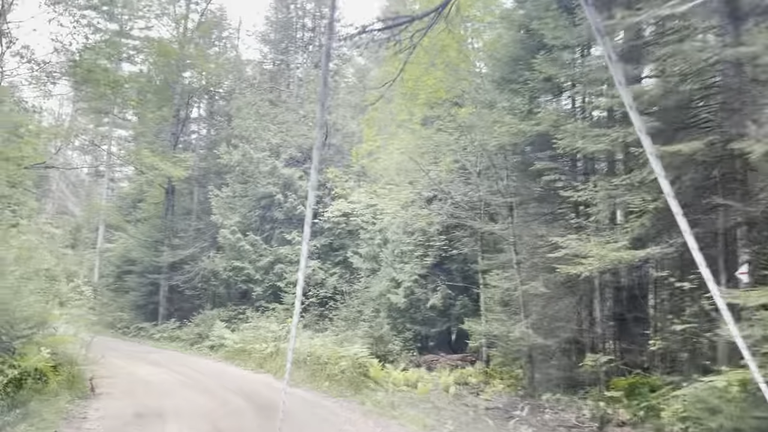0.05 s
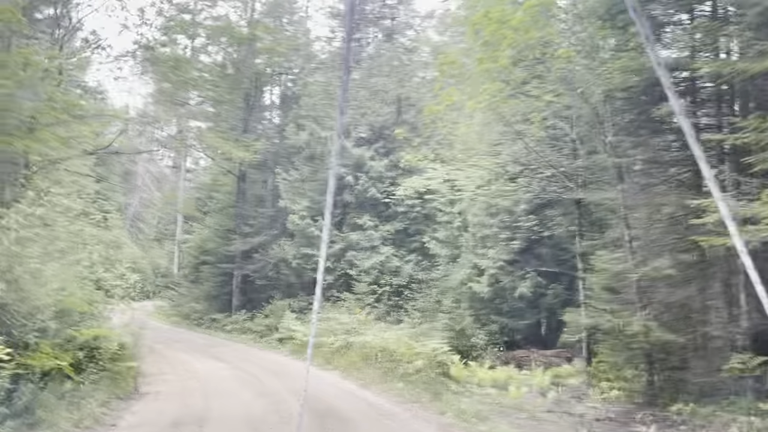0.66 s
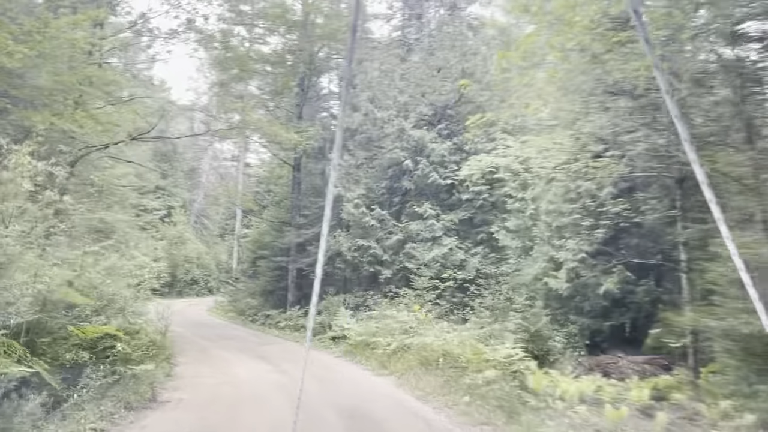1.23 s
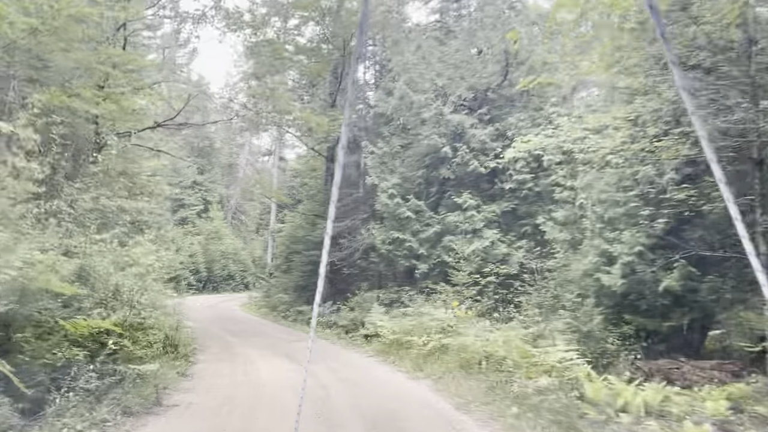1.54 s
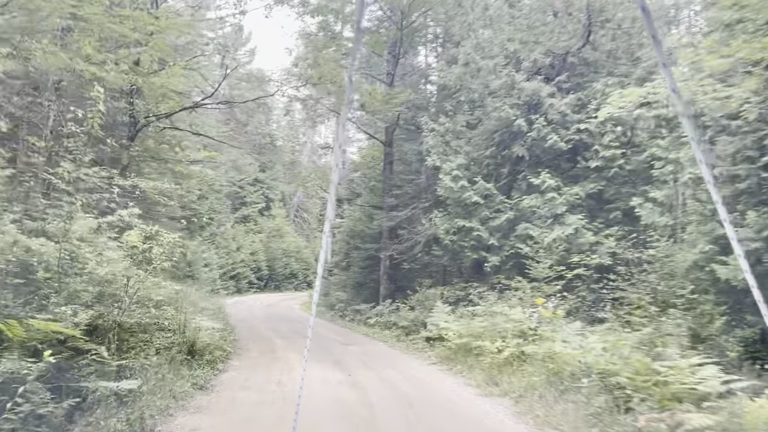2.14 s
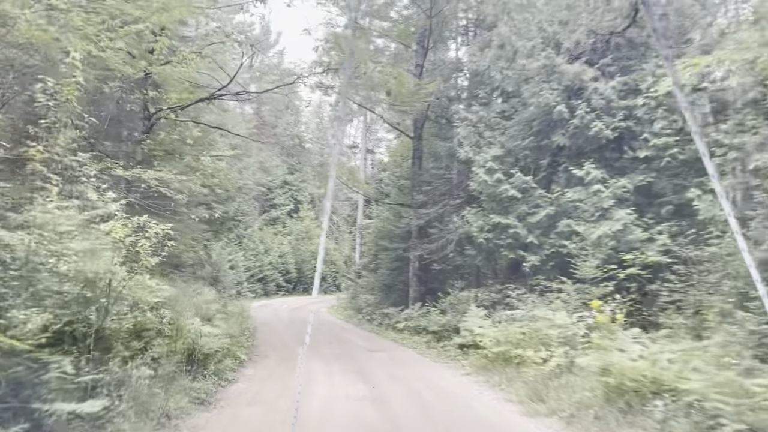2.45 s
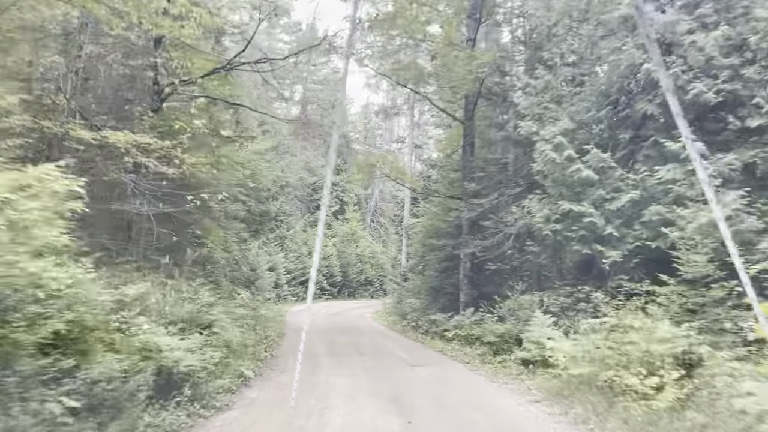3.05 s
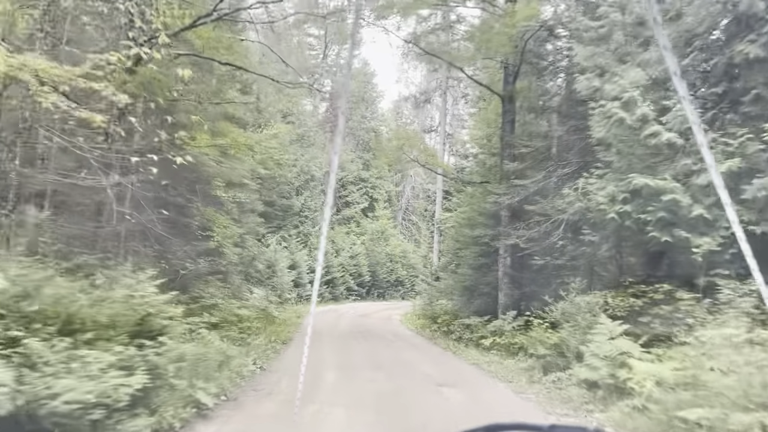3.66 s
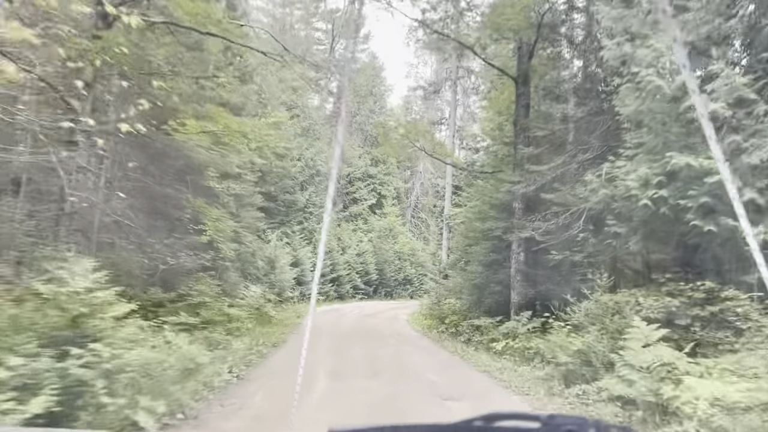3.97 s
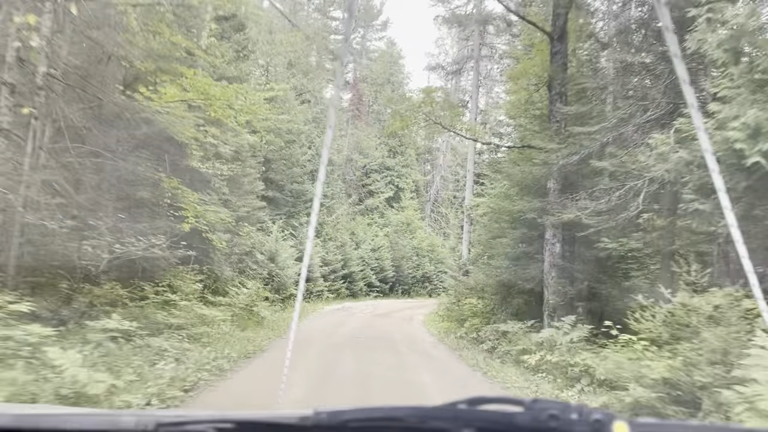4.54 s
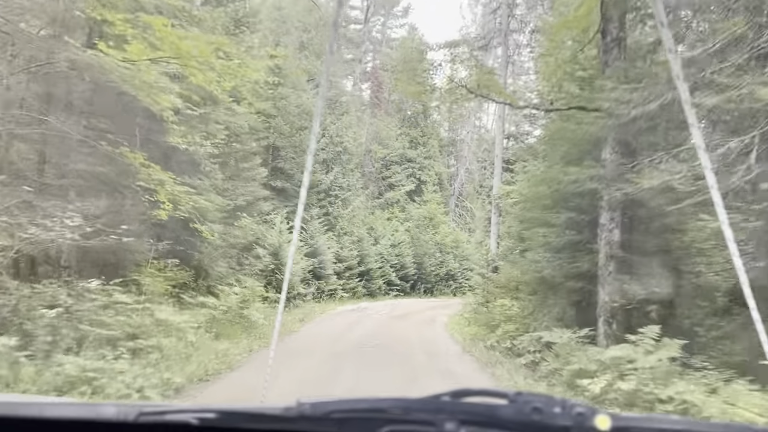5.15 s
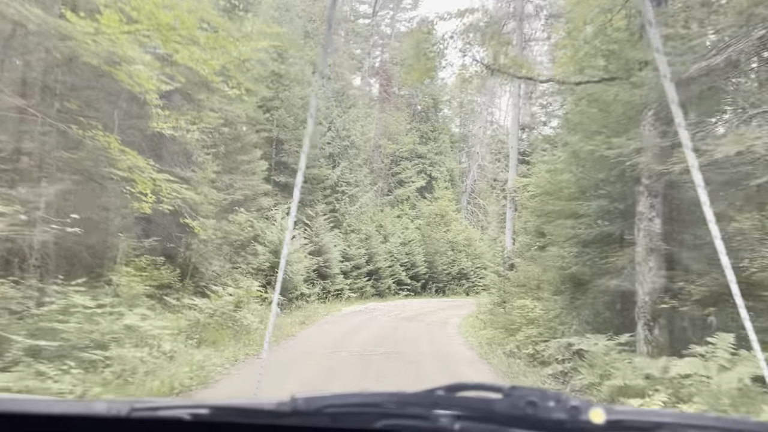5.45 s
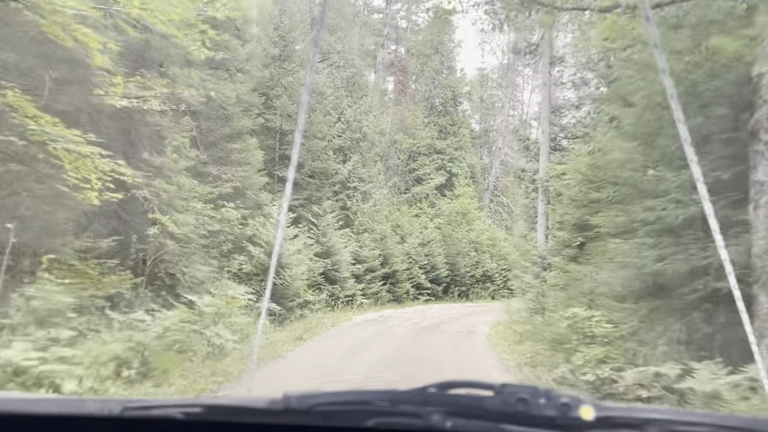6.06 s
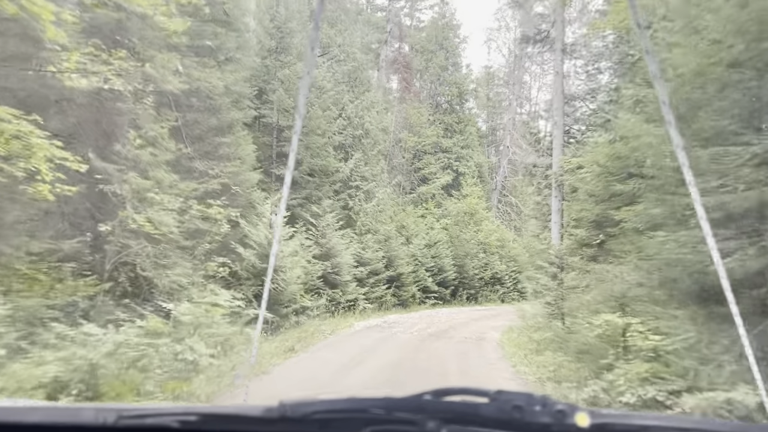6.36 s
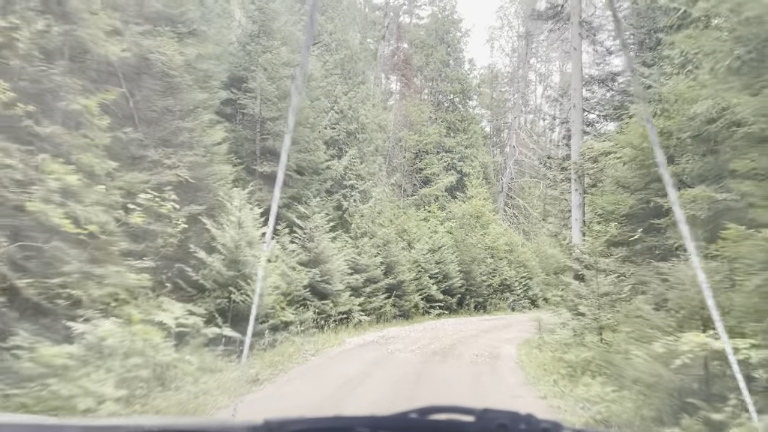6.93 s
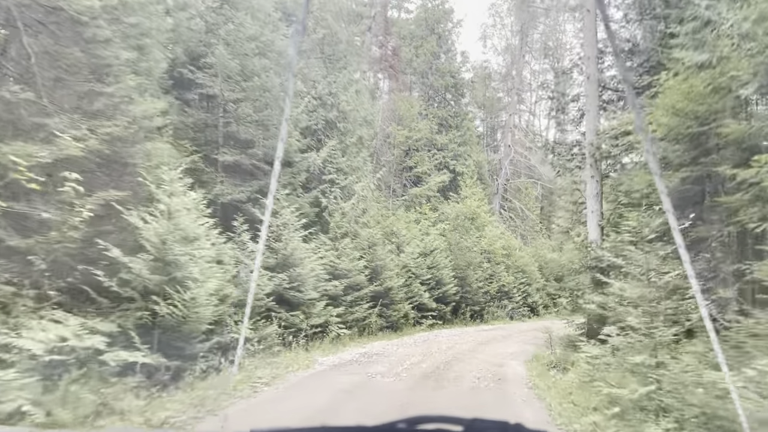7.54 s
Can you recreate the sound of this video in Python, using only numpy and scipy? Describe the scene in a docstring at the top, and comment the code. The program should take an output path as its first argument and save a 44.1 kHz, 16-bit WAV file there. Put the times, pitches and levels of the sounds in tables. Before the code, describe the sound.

Low, uneven road rumble fills the cabin of a slow car on a gravel forest track, picked up by a phone inside. A quiet engine climbs a little beneath it, while the tyres grind and set off scattered clicks and quick flurries of pebbles. Stones knock against the floor, loudest near the start. Toward the end, gravel spray briefly brightens the steady hiss, followed by a tiny metallic ping, a short scrape and another knock.

```python
"""Inside a car rolling slowly along a woodland gravel road, heard on a phone behind the windscreen.
From the start, bumps make the cabin boom and throb over a soft engine and a high microphone hiss; tyres
crunch, small stones tick and loose patches set off flurries of pebbles. At 1 s the loudest of many stones
knocks on the underbody. The engine rises a little. Around 6 s fine gravel spray swells over the hiss and
a pebble pings off steel; at 7 s a stone scrapes along the road, and a last knock comes near the end."""
import sys
import numpy as np
from scipy import signal
from scipy.fft import rfft, irfft
from scipy.io import wavfile
from scipy.ndimage import uniform_filter1d

SR = 44100
rng = np.random.default_rng(int(sys.argv[2]) if len(sys.argv) > 2 else 0)


def to_wav(s):
    """Save 16-bit WAV."""
    ch = np.atleast_2d(s).T  # columns
    pcm = np.round(np.clip(ch, -1, 1) * 32767)  # PCM
    wavfile.write(sys.argv[1], SR, pcm.astype(np.int16))


N = 343980

# Spectra of a rasping stone and of mid-sized grit. Each row: frequency in Hz, level in dB.
RASP_SPECTRUM = [(500, 6), (1000, 1.5), (1800, 2), (2500, -6.5), (3100, -21)]
GRIT_SPECTRUM = [(900, -29.5), (1400, -2.5), (1800, 0), (2300, -1.5), (2900, -4), (3400, -10),
                 (4000, -11.5), (5500, -41)]


def undb(db):
    """Decibels to gain."""
    return 10 ** (np.asarray(db) / 20)


def curves(table):
    """The columns of a time table, one value a sample."""
    times, *columns = np.transpose(table)
    return [np.interp(np.arange(N) / SR, times, c) for c in columns]


def over_frequency(table, size):
    """The columns of a frequency table on the bins of a sound of this size."""
    hz, *columns = np.transpose(table)
    bins = np.log(np.maximum(np.fft.rfftfreq(size, 1 / SR), 1))
    return [np.interp(bins, np.log(hz), c) for c in columns]


def unit(x):
    """Scale to rms 1."""
    return x / np.sqrt(np.mean(x ** 2))


def colour(x, spectrum):
    """Shape a sound by a spectrum that falls away steeply past its ends."""
    size = x.shape[-1]
    hz = np.fft.rfftfreq(size, 1 / SR) + 1
    skirts = np.minimum(1, np.minimum(hz / spectrum[0][0], spectrum[-1][0] / hz)) ** 4
    return irfft(rfft(x) * skirts * undb(over_frequency(spectrum, size)[0]), size)


def noise(size=N):
    """Two unrelated noises: what the phone's two microphones share, and what differs between them."""
    return rng.standard_normal((2, size))


def walk(rate):
    """A smooth random wander with spread 1."""
    hold = int(SR / rate)
    steps = np.repeat(rng.standard_normal(N // hold + 1), hold)
    return unit(uniform_filter1d(steps, hold)[:N])


def add(out, x, start_s):
    """Mix a short sound in at its start time."""
    i = max(int(start_s * SR), 0)
    out[:, i:i + x.shape[1]] += x[:, :max(N - i, 0)]


def resonance(spectrum):
    """A low resonance kept at an even level, so that the road alone sets its swell."""
    x = colour(noise(), spectrum)
    return x / np.sqrt(uniform_filter1d(x[0] ** 2, size=3200))


def impacts(rate, spread_db, ring_s):
    """Energy of a stream of stone contacts, mean 1: many weak, a few strong, each dying quickly."""
    hits = rng.random(N) < rate / SR
    strength = np.minimum(rng.exponential(size=N), 3.6)
    energy = signal.lfilter([1], [1, -np.exp(-2 / (ring_s * SR))], hits * undb(spread_db * strength) ** 2)
    return energy / energy.mean()


def grains(energy, share, spectrum):
    """Separate contacts stand out of an even wash of noise."""
    return unit(colour(noise() * np.sqrt(1 - share + share * energy), spectrum))


def strike(ring_s, echo_s, echo_db, cabin_s, cabin_db):
    """One contact: a short burst, its reflection off the glass and a faint cabin tail."""
    t = np.arange(4096) / SR
    burst = np.exp(-2 * t / ring_s)
    echo = (t > echo_s) * undb(echo_db) ** 2 * np.exp(-2 * np.maximum(t - echo_s, 0) / ring_s)
    tail = undb(cabin_db) ** 2 * np.exp(-2 * t / cabin_s)
    return noise(len(t)) * np.sqrt(burst + echo + tail)


def engine():
    """Firing lines and a faint drive-train whine rise as the car leaves the bend."""
    # Each row: time in seconds, firing rate in Hz, level in dB.
    revs = [(0, 61.42, -42.5), (1.5, 61.96, -35.5), (2.4, 66.45, -43.5), (3.1, 69.9, -36.5),
            (3.7, 71.3, -34), (4.9, 72.69, -36), (6.4, 72.05, -34.5), (7.8, 72.17, -34)]
    # Engine and drive-train lines. Each row: multiple of the firing rate, level in dB.
    orders = [(.49, -1), (1, .5), (2, -4.5), (3.45, -20.5), (4.95, -19.5), (6.69, -25), (9.15, -35.5)]
    firing_hz, db = curves(revs)
    phase = 2 * np.pi * np.cumsum(firing_hz * (1 + 0.002964 * walk(rate=6))) / SR
    hum = sum(undb(line_db + 2 * walk(rate=5)) * np.sin(order * phase + rng.uniform(0, 2 * np.pi))
              for order, line_db in orders)
    return np.array([hum * undb(db), np.zeros(N)])


def bumps(width_s=.047):
    """How far each bump in the road shifts the boom and the drone, in dB."""
    # Each row: time in seconds, lift of the boom in dB, lift of the drone in dB.
    lifts = [(0.201, 7.5, -4.5), (0.53, 6.5, 3), (0.751, 6.5, 3), (1.22, 7.5, -1.5), (1.72, 7.5, -5.5),
             (2.02, 8, -1), (2.511, 8, 4), (2.6, 4, -0.5), (2.699, 9, 1.5), (2.91, 7, 6), (3.01, 8.5, -2),
             (3.13, 5, 2.5), (3.269, 6.5, 1), (3.55, 3, 9.5), (3.73, 3.5, -3), (3.93, 5, 4),
             (4.21, 7.5, -2), (4.45, 8.5, 3), (4.87, 5.5, 1.5), (5.04, 6, 3.5), (5.3, 6.5, 1.5),
             (5.48, 3, 1), (5.68, 5, -0.5), (5.93, 8.5, -4), (6.0, -1.5, 5.5), (6.07, 7.5, -0.5),
             (6.27, 3.5, -2.5), (6.42, 3.5, 8), (6.67, 9, 1), (7.08, 6, -1), (7.669, 6, -6.5)]
    t = np.arange(N) / SR
    return sum(np.outer(lift_db, np.exp(-((t - at_s) / width_s) ** 2)) for at_s, *lift_db in lifts)


def rumble():
    """The road shakes the suspension without pause; the body shudders, cabin air and panels ring."""
    # How hard the car shakes. Each row: time in seconds, cabin boom in dB, body drone in dB.
    ride = [(0, -26.5, -34.5), (0.55, -29.5, -34), (1.0, -29.5, -38), (1.5, -30.5, -37.5),
            (1.8, -25.5, -36.5), (2.3, -25.5, -34.5), (2.9, -26.5, -33), (3.4, -24.5, -34.5),
            (3.9, -26.5, -33), (4.7, -26.5, -37), (5.4, -25.5, -34), (6.9, -30.5, -35), (7.8, -25.5, -32.5)]
    # Deep shudder, tyres thudding on stones, hollow panels. Each row: time in seconds, level in dB.
    shudder_levels = [(0, -25.5), (.25, -24), (.5, -27.5), (1.05, -32.5), (1.8, -31.5), (2.1, -23.5),
                      (2.47, -34.5), (3.0, -24), (3.35, -38.5), (3.65, -23.5), (4.6, -28.5), (4.95, -30.5),
                      (5.35, -28), (6.1, -34.5), (7.0, -32.5), (7.55, -27), (7.8, -29.5)]
    thud_levels = [(0, -43), (.42, -42), (.9, -48), (1.1, -45), (1.5, -42), (1.9, -42.5), (2.55, -39.5),
                   (2.85, -39), (3.15, -42.5), (3.85, -41), (4.05, -44), (4.65, -42.5), (5.7, -41.5),
                   (6.4, -43), (6.75, -45), (7.0, -42.5), (7.3, -47), (7.8, -38.5)]
    panel_levels = [(0, -45.5), (0.9, -45.5), (1.3, -49.5), (2.2, -46), (3.3, -50.5), (7.8, -48)]
    # Their spectra in the cabin. Each row: frequency in Hz, level in dB.
    shudder_spectrum = [(18, -39), (24, -25.5), (29, -5.5), (34, 0.5), (41, -6), (48, -4.5), (56, -8),
                        (64, -24)]
    boom_spectrum = [(40, -22), (54, -10), (62, -3), (69, 1.5), (78, -4.5), (90, -17), (104, -25),
                     (140, -57)]
    drone_spectrum = [(75, -43.5), (100, -2), (115, 4.5), (135, -3.5), (160, -13), (200, -35)]
    thud_spectrum = [(140, -24), (170, -11), (205, -11.5), (235, -18.5), (275, -17.5), (310, -28.5),
                     (440, -32), (600, -43)]
    panel_spectrum = [(260, -24), (305, -3.5), (338, 1.5), (375, -6), (410, -14.5), (470, -26)]
    boom_db, drone_db = curves(ride) + bumps()
    # Lesser unevenness of the road makes the levels waver.
    shudder = resonance(shudder_spectrum) * undb(curves(shudder_levels)[0] + 1.3 * walk(rate=11))
    boom = resonance(boom_spectrum) * undb(boom_db + 1.36 * walk(rate=11))
    drone = resonance(drone_spectrum) * undb(drone_db - .5 + 1.83 * walk(rate=14))
    jolts = impacts(rate=90, spread_db=1.0, ring_s=0.034)
    thud = grains(jolts, 0.35, thud_spectrum) * undb(curves(thud_levels)[0] + 0.23)
    panel = grains(jolts, 0.15, panel_spectrum) * undb(curves(panel_levels)[0] - 1.5)
    return shudder + boom + drone + thud + panel


def tyres_and_hiss():
    """Stones grind under the tread; around 6 s fine gravel spray swells over steady microphone hiss."""
    # Each row: time in seconds, coarse crunch in dB, high hiss in dB.
    levels = [(0, -59, -67), (1.1, -59.5, -67), (1.6, -57, -66), (2.15, -57, -66.5), (2.4, -55, -66.5),
              (2.85, -54.5, -63.5), (3.1, -58.5, -66.5), (3.5, -60, -68), (4.0, -59, -65),
              (4.7, -60.5, -65.5), (5.25, -59.5, -64), (5.65, -58.5, -61.5), (6.28, -59.5, -60.5),
              (6.45, -61.5, -63.5), (7.4, -60.5, -64), (7.8, -56, -64)]
    # Each row: frequency in Hz, level in dB.
    crunch_spectrum = [(300, -19), (450, 3), (530, 0.5), (640, 0.5), (790, 2), (890, -5.5), (1030, -5),
                       (1250, -9), (1500, -15.5), (2200, -26)]
    hiss_spectrum = [(2800, -17), (4100, -8), (5200, -4), (7000, -5.5), (8000, -3), (8700, 1.5), (9400, 1),
                     (10100, -3.5), (10500, -12), (11000, -15)]
    crunch_db, hiss_db = curves(levels)
    grit_db = crunch_db + 0.61 * (hiss_db - crunch_db) - 2.5  # mid-sized grit follows a blend of both
    stones = impacts(rate=260, spread_db=3.0, ring_s=0.0046)
    chips = impacts(rate=300, spread_db=6.0, ring_s=0.017)
    sand = impacts(rate=240, spread_db=9.0, ring_s=0.021)
    crunch = grains(stones, 0.41, crunch_spectrum) * undb(crunch_db + 1.0)
    grit = grains(0.46 * chips + 0.11 * stones, 0.44, GRIT_SPECTRUM) * undb(grit_db)
    hiss = grains(0.95 * sand + 0.7 * chips, 0.19, hiss_spectrum) * undb(hiss_db - 1.65)
    return crunch + grit + hiss


def scrape(peak_s=6.997, fade_s=.022, db=-54):
    """A stone is dragged briefly along the road: a rasp of quick slips that swells and fades."""
    envelope = np.exp(-np.abs(np.arange(N) / SR - peak_s) / fade_s)
    slips = impacts(rate=300, spread_db=2, ring_s=.003)
    return grains(slips, .7, RASP_SPECTRUM) * envelope * undb(db)


def ping(start_s=6.2375, t60_s=.028, db=-46):
    """One pebble glances off a steel part, which rings for a moment."""
    # Each row: frequency in Hz, level in dB.
    steel_modes = [(3130, 0), (3420, -5)]
    t = np.maximum(np.arange(N) / SR - start_s, 0)
    ring = sum(undb(mode_db) * np.sin(2 * np.pi * hz * t) for hz, mode_db in steel_modes)
    return np.array([ring * np.exp(-np.log(1000) * t / t60_s) * undb(db), np.zeros(N)])


def faint_ticks(count, per_second=2.5, db=-55, body_db=-7):
    """Lesser stones fly up at random moments: more rows for ticks()."""
    return [(start_s, db, body_db) for start_s in np.cumsum(rng.exponential(1 / per_second, count))]


def ticks(skid_s=.0006):
    """Small hard stones skid and tick brightly; the heavier ones have more body."""
    # Each row: start in seconds, level in dB, body relative to treble in dB.
    stones = [(0.1991, -52, -9), (0.332, -53.5, -10), (0.451, -48.5, -1.5), (0.6592, -44.5, -9),
              (0.724, -49.5, -16), (0.763, -54, -4), (0.98, -55, -10), (1.125, -47, -15), (1.169, -53, -11),
              (1.477, -53, 0), (1.689, -55, -3), (1.736, -45.5, -23), (1.936, -47, -2.5), (2.094, -49, -17),
              (2.2514, -48, -16), (2.336, -49.5, -1), (2.626, -53.5, 1), (2.791, -46.5, -4),
              (2.997, -47.5, -2), (3.041, -50, -10), (3.273, -52, -25), (3.4318, -47.5, -11),
              (3.486, -51, -8), (3.717, -55, -5), (4.3813, -49.5, -4), (4.817, -53, 3.5), (4.886, -49, -10),
              (5.237, -42, -6), (6.236, -46, -12), (6.323, -47.5, -2.5), (6.939, -53, -3),
              (7.095, -50, -12), (7.5238, -53, 0), (7.701, -39, -9)]
    # Each row: frequency in Hz, level in dB.
    treble_spectrum = [(2500, -24), (4500, -9.5), (6200, -3.5), (7500, -4), (9000, 1.5), (9900, 1),
                       (11000, -13)]
    treble, body = np.zeros((2, 2, N))
    for start_s, db, body_db in stones + faint_ticks(count=30):
        tick = strike(ring_s=.005, echo_s=.004, echo_db=-3, cabin_s=.02, cabin_db=-10) * undb(db + 1)
        tick *= 1 - np.exp(-np.arange(tick.shape[1]) / SR / skid_s)  # the stone takes a moment to bite
        add(treble, tick, start_s)
        add(body, tick * undb(body_db), start_s)
    return colour(treble, treble_spectrum) + colour(body, GRIT_SPECTRUM) * undb(6)


def flurries(count, gap_s=.007, spread_db=1.5, spread_octaves=.25):
    """Each loose patch lets go a quick uneven run of pebbles: more rows for snaps()."""
    # Each row: start and length in seconds, pebble level in dB, typical ring in Hz.
    patches = [(0.161, 0.065, -53, 2200), (0.44, .027, -48, 2700), (1.575, .06, -52, 2300),
               (2.757, .15, -53.5, 4000), (5.62, .1, -51, 2000), (6.05, .085, -54, 3400),
               (6.245, .08, -52, 3700)]
    pebbles = []
    for start_s, length_s, db, hz in patches:
        delays = gap_s * (np.arange(count) + rng.random(count))
        for delay, (size, pitch) in zip(delays, rng.standard_normal((count, 2))):
            if delay < length_s:
                ring_hz = hz * 2 ** np.clip(spread_octaves * pitch, -1, 1)
                pebbles.append((start_s + delay, db + spread_db * size, ring_hz))
    return pebbles


def snaps():
    """Pebbles squeezed against each other under the tread crack with a brief pitched ring."""
    # Each row: start in seconds, level in dB, ring in Hz.
    pebbles = [(0.178, -43, 1750), (0.201, -44, 2100), (0.345, -49, 4400), (0.454, -46, 2300),
               (0.762, -47, 2700), (1.572, -46, 2000), (1.597, -43, 2650), (1.622, -48, 3000),
               (1.715, -45, 1700), (2.707, -43, 2260), (2.823, -44, 2300), (2.842, -44, 2800),
               (3.243, -45, 1600), (3.722, -50, 3800), (4.47, -44, 2200), (4.488, -48, 2100),
               (4.853, -42, 1900), (5.237, -43, 5500), (5.704, -44, 2200), (5.8, -46, 2200),
               (5.812, -41, 2400), (6.032, -44, 1935), (6.057, -45.5, 4400), (6.072, -46, 4100),
               (6.082, -47, 3600), (6.099, -44.5, 4000), (6.124, -40, 2580), (6.193, -47, 4000),
               (6.202, -45.5, 5300), (6.213, -43, 1900), (6.237, -44, 4200), (6.271, -46, 4500),
               (6.284, -45, 3700), (6.457, -49, 3000), (6.706, -50, 4500), (6.94, -44.5, 2300),
               (7.108, -46, 2000), (7.604, -44, 1900), (7.623, -44, 2800), (7.702, -41, 2800)]
    out = np.zeros((2, N))
    for start_s, db, hz in pebbles + flurries(count=20):
        band = signal.butter(2, [hz / 1.5, hz * 1.3], "band", fs=SR, output="sos")
        contact = strike(ring_s=.002, echo_s=.0025, echo_db=-8, cabin_s=.014, cabin_db=-19)
        snap = signal.sosfilt(band, contact)
        add(out, snap / np.abs(snap).max() * undb(db - 2.5), start_s)
    return out


def knocks(tilt_above_hz=800, attack_s=.00029, tail_s=.013, crack_s=.0025):
    """Thrown stones ring the damped floor pan; a harder contact favours the high modes."""
    # Each row: start in seconds, level in dB, treble tilt in dB per octave, pitch ratio of the spot hit.
    stones = [(0.326, -40, -6, .82), (0.697, -33, -8, .7), (0.762, -42.5, 1, .95), (1.0077, -25.8, -2, 1),
              (1.015, -38, 1, .97), (1.023, -41, -3, 1.06), (1.033, -43, 1, 1.04), (1.594, -32.5, -4, .85),
              (2.383, -40, -6, .78), (2.844, -41, -3, .9), (2.93, -39, -5, .82), (4.367, -33.5, -6, .78),
              (4.374, -38, -6, .8), (4.383, -40, -2, .85), (5.325, -41, -8, .72), (5.439, -44, -7, .7),
              (5.812, -39.5, 2, .95), (6.72, -41.5, 0, 1), (7.702, -33, -3, .7)]
    # Each row: mode frequency in Hz, level in dB, seconds to fall by 60 dB.
    floor_pan = [(255, -9, 0.04), (339, -1, 0.086), (470, 0, 0.035), (590, -2.5, 0.04), (748, -4.5, 0.04),
                 (940, -3, 0.019), (1025, 3, 0.03), (1200, -6, .02), (1430, -4, .024), (1750, -12, 0.028),
                 (2060, -12, 0.028), (2430, -15, 0.017)]
    out, t = np.zeros((2, N)), np.arange(4096) / SR
    hz, mode_db, t60 = np.transpose(floor_pan)[:, :, None]
    octaves_above = np.maximum(np.log2(hz / tilt_above_hz), 0)
    lag = np.pi / 2 * np.arange(2)[:, None, None]  # the microphones' difference lags a quarter cycle
    phase = np.pi * np.arange(len(hz))[:, None] - lag  # neighbouring modes swing opposite ways
    fade_out = signal.windows.tukey(2 * len(t), .5)[len(t):]
    for start_s, db, tilt_db, spot in stones:
        pitch = spot * hz * (1 + .01 * rng.standard_normal(hz.shape))
        decays = undb(mode_db + tilt_db * octaves_above) * np.exp(-np.log(1000) * t / t60)
        ring = (decays * np.sin(2 * np.pi * pitch * t + phase)).sum(axis=1) * (1 - np.exp(-t / attack_s))
        # The cabin scatters the ring into a short dull tail.
        tail = signal.fftconvolve(noise(len(t)) * np.exp(-t / tail_s), ring, axes=1)[:, :len(t)]
        crack = colour(noise(len(t)) * np.exp(-t / crack_s), RASP_SPECTRUM) * fade_out
        knock = unit(ring) + undb(-8.5) * unit(tail) + undb(tilt_db - 11) * unit(crack)
        add(out, knock * undb(db - 21.5), start_s)
    return out


def microphones(cabin):
    """Two close microphones, alike in the bass and opposed where cabin waves stand between them."""
    # Each row: frequency in Hz, coherence from 0 to 1, right's lead in radians, left minus right in dB.
    stereo_image = [(40, .99, 0, 0), (85, .88, -.2, 1.3), (140, .97, 0, -.5), (250, .72, -.2, 1.5),
                    (340, .93, .6, -3), (450, .35, .6, 0), (550, .25, 2.6, 2), (650, .5, 3.4, 0),
                    (1150, .67, 3.1, -2), (1650, .2, 1.8, -6), (2200, .67, .2, -3), (3000, .67, .9, -3),
                    (6900, .6, .5, -3.5), (7700, .9, 1.2, -1), (8700, .96, 0, 0), (10300, .96, -3.1, 0)]
    coherence, lead, balance_db = over_frequency(stereo_image, N)
    shared, apart = rfft(cabin)
    sides = np.array([[1], [-1]])
    pair = shared * np.sqrt(1 + coherence) + sides * apart * np.sqrt(1 - coherence)
    pair = pair * np.exp(-.5j * sides * lead) * undb(sides * balance_db / 2)
    # The sum of left and right keeps each source's spectrum, except where they nearly cancel.
    return irfft(pair / np.sqrt(np.maximum(1 + coherence * np.cos(lead), .33)), N)


def scene():
    """Road, engine and stones as they arrive behind the windscreen."""
    cabin = rumble() + engine() + tyres_and_hiss() + knocks() + ticks() + snaps() + scrape() + ping()
    soft_ends = signal.windows.tukey(N, .002)
    return microphones(cabin * soft_ends)


def record(dry):
    """The phone cuts the deepest bass and the top."""
    low_cut = signal.butter(8, 26, "high", fs=SR, output="sos")
    high_cut = signal.ellip(8, .2, 70, 11500, fs=SR, output="sos")
    return signal.sosfilt(high_cut, signal.sosfilt(low_cut, dry))


dry = scene()
out = record(dry)
to_wav(out)
```